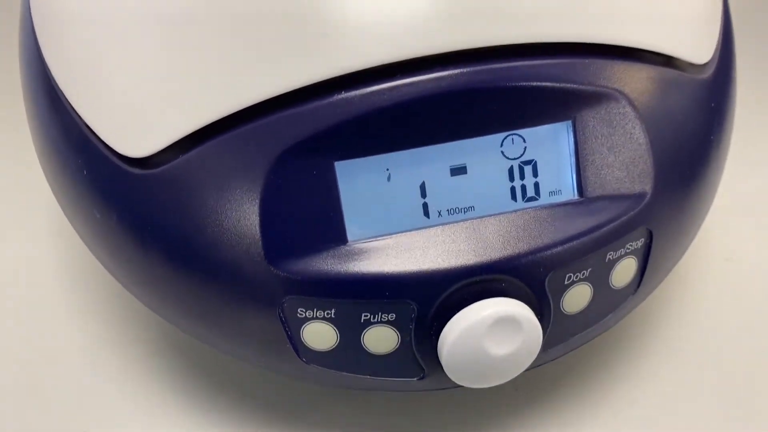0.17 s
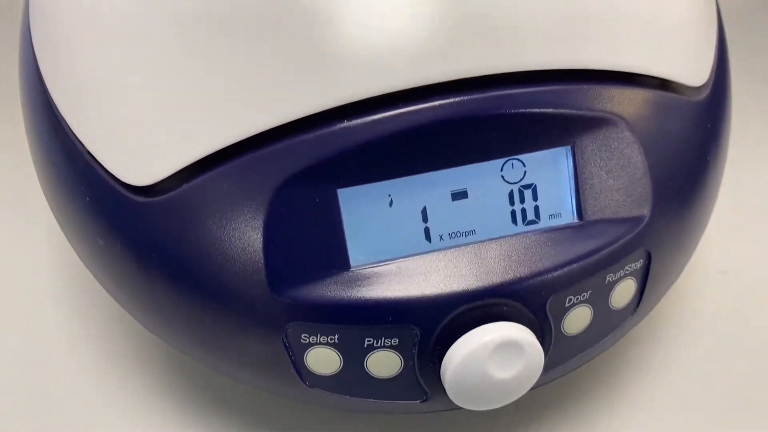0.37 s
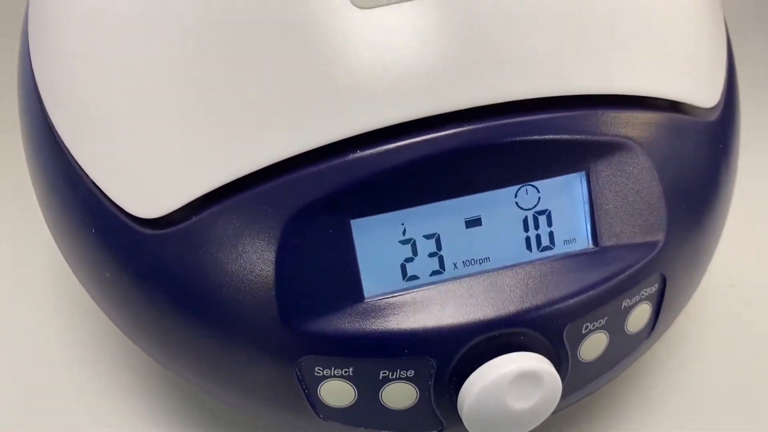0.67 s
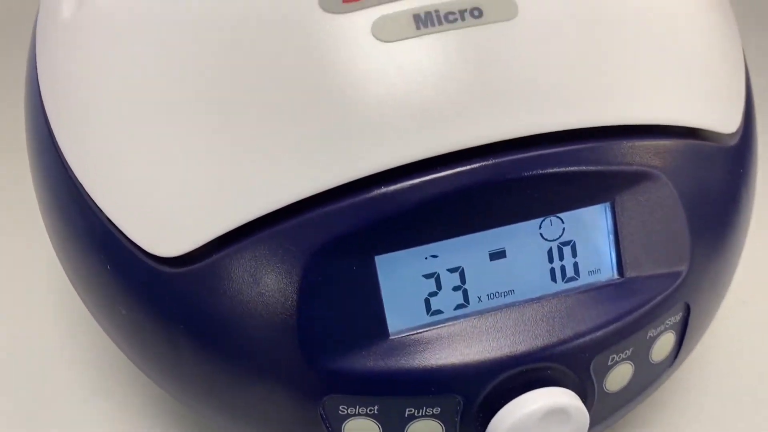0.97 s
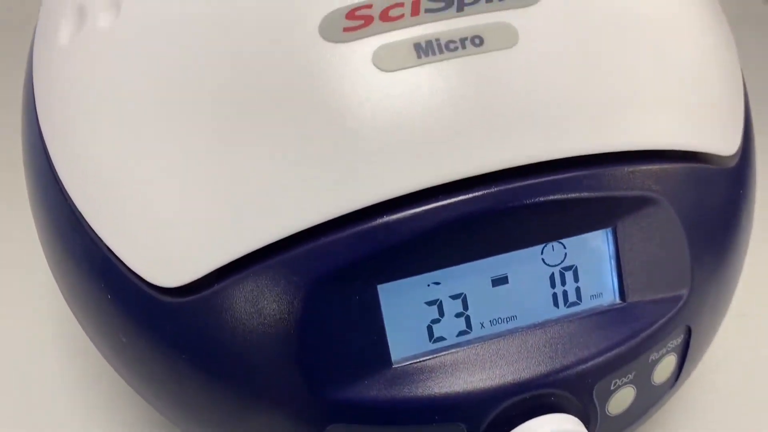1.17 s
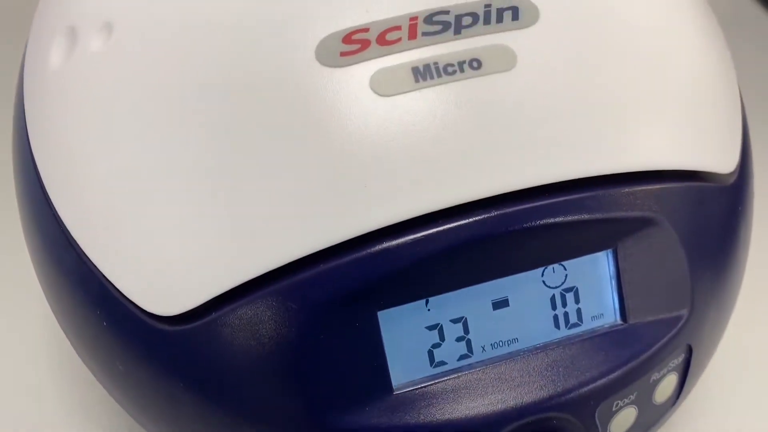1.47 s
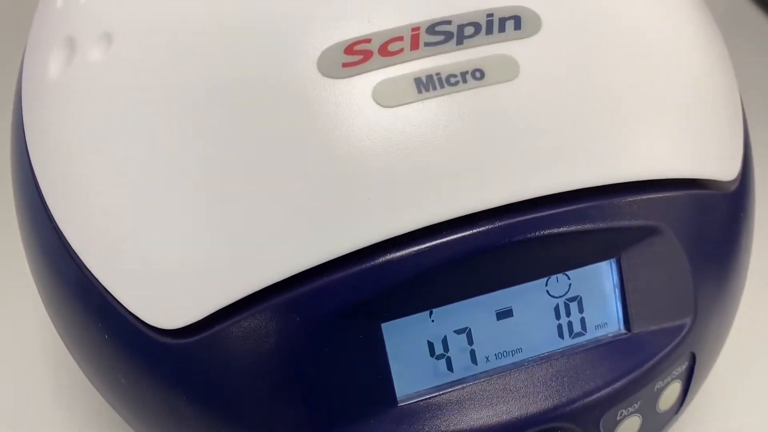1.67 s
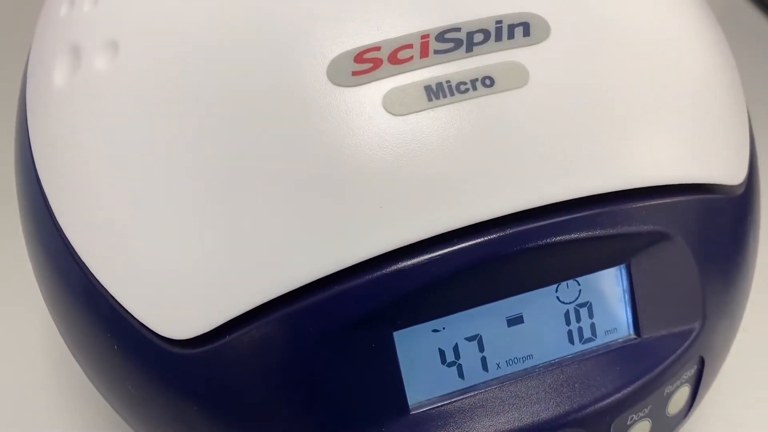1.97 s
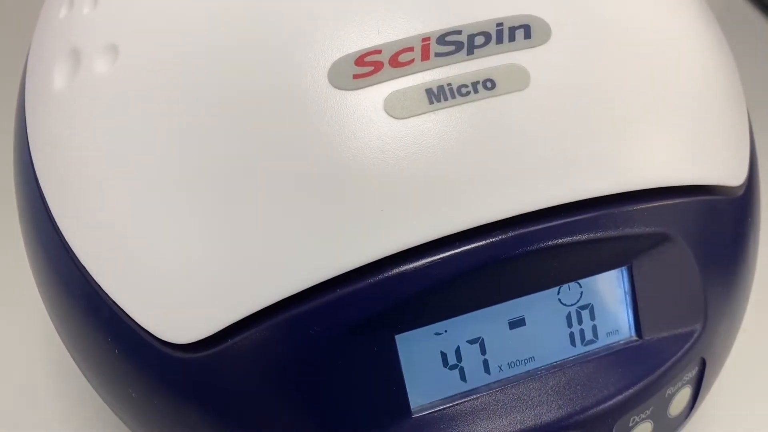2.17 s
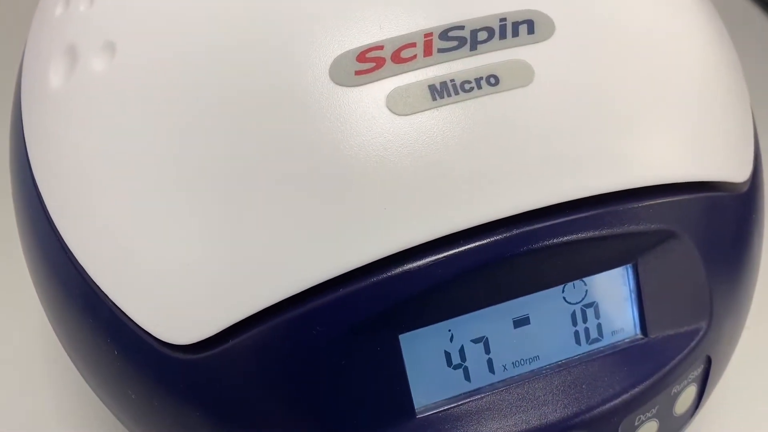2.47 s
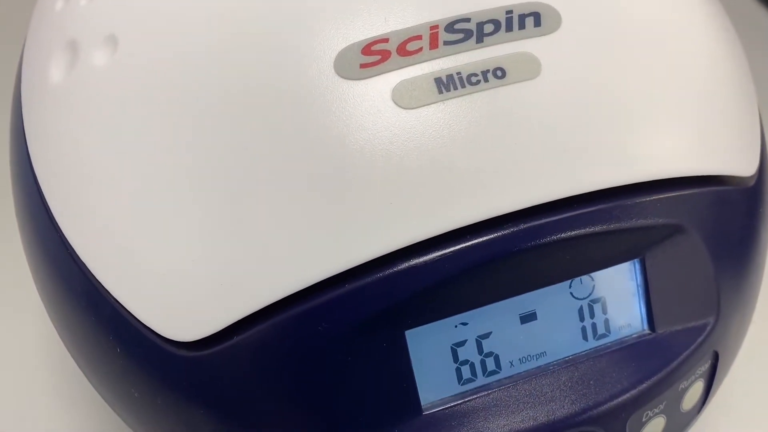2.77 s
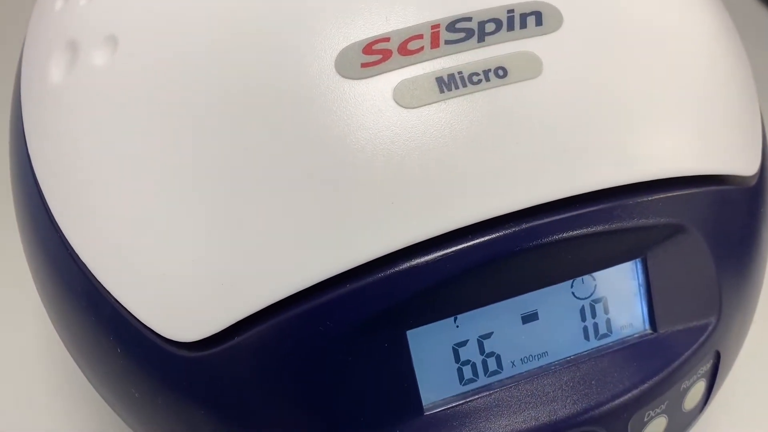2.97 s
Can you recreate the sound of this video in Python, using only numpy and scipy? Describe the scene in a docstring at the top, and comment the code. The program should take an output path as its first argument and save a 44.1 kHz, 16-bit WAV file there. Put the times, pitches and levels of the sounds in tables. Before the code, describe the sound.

Rough, chirping motor whirr of a benchtop centrifuge rises as it accelerates over faint room rumble

```python
"""A rough motor whirr close by climbs in pitch: a small centrifuge spinning up on a lab bench, still rising at the end.
The whirr is one pattern repeated each turn; its multiples climb one after another through the housing and chirp there.
Filtered noise, ringing panels and wavering sines make the rotor's air and bearings, which grow or climb with speed.
Underneath, the room's ventilation rumbles, draws air and hums, built from noise and two steady-pitched sines."""
import sys
import numpy as np
from scipy import signal
from scipy.fft import rfft, irfft, next_fast_len
from scipy.io import wavfile
from scipy.ndimage import uniform_filter1d

SR = 44100
rng = np.random.default_rng(int(sys.argv[2]) if len(sys.argv) > 2 else 0)


def materialize(psi):
    """Save the field psi as 16-bit PCM at rate SR to the path in sys.argv[1].

    A 1-D psi becomes a single channel; in a 2-D psi each row is a channel.
    """
    bounded = np.clip(np.atleast_2d(psi).T, -1, 1)
    quanta = np.round(bounded * 32767).astype(np.int16)
    wavfile.write(sys.argv[1], SR, quanta)


N = 137151

# rotor speed closes in exponentially on its goal (turns per s, turns per s, time constant in s)
START_HZ, GOAL_HZ, SPIN_UP_S = 42.95, 242.8, 4.616
REFERENCE_HZ = 125  # speed in turns per s at which the speed-driven levels hold

# whirr: multiples that drive the housing's main resonance [multiple: level/dB before the housing]
MAIN_ORDERS = {19: 14.5, 22: 13.5, 25: 9.5, 28: 12, 31: 5, 34: 11, 37: -1, 40: 9.5, 43: -2, 46: 7.5, 52: 7}
# how the housing passes them [f/Hz, gain/dB]
MAIN_HOUSING = [(500, -8), (900, -24), (1100, -25), (1650, -26), (2030, -34), (2255, -22), (2300, -10),
                (2340, -2), (2385, 1.5), (2422, -2), (2468, 1.5), (2495, -.5), (2518, -8), (2545, -1.5),
                (2568, -6.5), (2598, -1), (2635, -12), (2690, -19), (2950, -24), (3500, -33), (5500, -33),
                (8000, -42), (12000, -20), (15500, -24)]
# weaker family that also reaches lower resonances [multiple: level/dB before the housing]
LOWER_ORDERS = {17: 2, 20: 3, 23: -2, 26: 2, 29: -2, 32: -3}
# how the housing passes those [f/Hz, gain/dB]
LOWER_HOUSING = [(1000, -26), (2080, -17), (2145, 2), (2205, -7), (2255, 3), (2290, -8), (2385, -1),
                 (2430, -6), (2595, 0), (2640, -7), (2740, -8), (3200, -22)]
# every third multiple, favouring the highest main peak [multiple: level/dB before the housing]
HIGHEST_ORDERS = {18: 1, 21: 8.5, 24: 1, 27: 8, 30: 3, 33: 6.5, 36: 2, 39: 7, 45: 3}
# how the housing passes those [f/Hz, gain/dB]
HIGHEST_HOUSING = [(1000, -22), (2320, -18), (2390, -6), (2475, -2), (2525, -7), (2598, 2.5), (2640, -9),
                   (2740, -14), (3300, -28)]
OTHER_ORDERS_DB, ORDER_SPREAD_DB = -12, 3  # every other multiple up to 149, through the main housing: centre level/dB, random spread/dB
SHAKE_TURNS, SHAKE_PER_S = .0006, 25  # unsteady rotor angle: spread in turns, wander rate in Hz
WHIRR_DB, WHIRR_DB_PER_OCTAVE = -58.6, 1  # gain on the pattern at the reference speed, rise with speed
WHIRR_WAVER_DB, WHIRR_WAVER_PER_S = .9, 14  # level wander: spread in dB, rate in Hz
WHIRR_ROOM_DB, ROOM_T60_S = -17, 0.077  # reflections against direct sound, 60 dB decay time

# bearing tones, mostly between multiples of the turning rate [multiple: level/dB before the housing]
BEARING_TONES = {28.3: -69, 31.85: -71, 35.4: -72, 37.12: -68, 38: -72, 39.25: -74, 42.45: -70, 46: -73,
                 55.3: -72}
# upper resonances that pass them [f/Hz, gain/dB]
UPPER_HOUSING = [(2500, -10), (3550, -8), (3720, 0), (3880, 2), (4020, -2), (4130, 3), (4260, -5),
                 (4520, 0), (5300, -4), (6300, -3), (8000, -12)]

# air rush colour [f/Hz, relative density/dB]
RUSH = [(30, -85), (200, -68), (450, -62), (620, -66.5), (870, -65), (1030, -74), (1350, -69.5),
        (1700, -66.5), (2050, -71.5), (2280, -70), (2400, -66.5), (2600, -66), (2690, -70.5), (2820, -73),
        (3500, -77), (3900, -77.5), (4800, -81), (5800, -86), (8000, -97.5), (16000, -115)]
RUSH_DB, RUSH_DB_PER_OCTAVE = -43, 0.5
# low churning of air under the lid [f/Hz, relative density/dB]
CHURN = [(25, -33), (60, -20), (130, 6), (220, -6), (280, -2.5), (370, -0.5), (480, -7.5), (700, -22),
         (1200, -13.5), (3000, -39)]
CHURN_DB, CHURN_DB_PER_OCTAVE = -40, 11.5
# bearing hiss colour [f/Hz, relative density/dB]
HISS = [(3000, -11), (5700, -7), (6400, 4.5), (7300, 6), (7700, 4.5), (10500, -0.5), (12300, 8),
        (14000, -2.5), (16000, 6)]
HISS_DB, HISS_DB_PER_OCTAVE = -51, 3.5
# low tones of the rotor stirring the air, at reference speed [multiple: level/dB before the body]
ROTOR_TONES = {1: -42.5, 3: -49.5, 6: -54, 12: -60, 13: -64}
ROTOR_DB_PER_OCTAVE = 14
# how the body radiates those tones [f/Hz, gain/dB]
BODY = [(100, 0), (320, -5), (357, 3.5), (378, -2), (395, -7), (720, -8), (752, 0), (790, 1), (810, -6),
        (1400, -5), (1510, 1), (1700, -4)]
# panel resonances stirred by turbulence, at reference speed [f/Hz, width/Hz, level/dB before panning]
PANELS = [(140.8, 9.2, -43), (270.3, 17, -54), (302.4, 23, -52), (358, 106, -53.5), (525, 40, -54.5),
          (822, 21, -55), (885, 16, -53.5), (939, 46, -56.5), (1111, 13, -60), (1313, 36, -55),
          (1528, 40, -57.5), (1754, 100, -75), (3860, 22, -66), (3920, 83, -63.5), (4080, 90, -64),
          (4680, 50, -68.5)]
PANEL_DB_PER_OCTAVE = 3.5

# the deepest rumble swells and sinks [t/s, level/dB before panning]
RUMBLE_LEVEL = [(0.0, -35), (0.83, -35.5), (0.96, -28), (1.0, -52), (1.07, -31.5), (1.16, -41.5),
                (1.35, -29.5), (1.4, -39), (1.56, -27.5), (1.58, -38), (2.1, -29.5), (2.13, -36),
                (2.16, -32), (2.2, -37.5), (2.75, -31), (3.0, -39), (3.05, -26.5), (3.11, -37)]
# rumble colour [f/Hz, relative density/dB]
RUMBLE = [(20, -73), (36, -23.5), (48, -9.5), (70, 0.5), (95, -0.5), (118, -21.5), (170, -28), (400, -65)]
RUMBLE_EVEN_S = .08  # natural swells of the rumble noise are levelled over this time
# ventilation draught colour [f/Hz, relative density/dB]
DRAUGHT = [(25, -70), (50, -57), (105, -53), (120, -48), (140, -42.5), (170, -46), (230, -55), (285, -47),
           (400, -67), (520, -58), (900, -60.5), (1200, -67), (4000, -121)]
DRAUGHT_DB = -39
# humming tones of the room [f/Hz, level/dB before panning]
HUM = [(199.4, -45), (657.5, -58)]
ROTOR_WAVER_DB, BEARING_WAVER_DB, HUM_WAVER_DB = 3.2, 3, 2.5  # spread of each tone's level wander

# stereo width of all the noise [f/Hz, side minus mid/dB]
WIDTH = [(60, -25), (170, -11), (350, -7.5), (700, -2), (1400, 1.5), (2450, -0.5), (4500, -6.5),
         (9000, 4.5), (14000, -2)]
WHIRR_PAN_DB, AIR_PAN_DB, VENT_PAN_DB = 2, 0.75, .75  # left raised and right lowered, each by this much
CUTOFF_HZ = 15700


def whirr(turns, octaves):
    """Motor roughness repeats ever faster; three families of multiples each ring the housing their own way."""
    angle = turns + SHAKE_TURNS * drift(SHAKE_PER_S)
    main = colour(each_turn(angle, MAIN_ORDERS, OTHER_ORDERS_DB), MAIN_HOUSING)
    lower = colour(each_turn(angle, LOWER_ORDERS, -np.inf), LOWER_HOUSING)
    highest = colour(each_turn(angle, HIGHEST_ORDERS, -np.inf), HIGHEST_HOUSING)
    shell = main + lower + highest
    waver_db = WHIRR_WAVER_DB * drift(WHIRR_WAVER_PER_S)
    level_db = WHIRR_DB + WHIRR_DB_PER_OCTAVE * octaves + waver_db
    in_room = shell + from_db(WHIRR_ROOM_DB) * room(shell)
    return from_db(level_db) * pan(WHIRR_PAN_DB) * in_room


def each_turn(angle, orders, others_db, count=150, size=8192):
    """A pattern of multiples of the turning rate, drawn as one cycle and read by the rotor's angle."""
    db = others_db + ORDER_SPREAD_DB * rng.standard_normal(count)
    for multiple, level_db in orders.items():
        db[multiple] = level_db
    phases = np.exp(2j * np.pi * rng.random(count))
    partials = from_db(db) * phases * (np.arange(count) > 0)  # no constant offset
    pattern = irfft(partials, size) * size / np.sqrt(2)  # each partial's rms matches its level
    return np.interp(angle, np.arange(size) / size, pattern, period=1)


def rotor(turns, octaves):
    """Rush, churning, ringing panels, low tones and bearing hiss, all growing with speed."""
    rush = from_db(RUSH_DB + RUSH_DB_PER_OCTAVE * octaves) * air(RUSH)
    churn = from_db(CHURN_DB + CHURN_DB_PER_OCTAVE * octaves) * air(CHURN)
    hiss = from_db(HISS_DB + HISS_DB_PER_OCTAVE * octaves) * air(HISS)
    growth_db = ROTOR_DB_PER_OCTAVE * octaves
    tones = sum(wavering_tone(multiple * turns, db + growth_db, ROTOR_WAVER_DB)
                for multiple, db in ROTOR_TONES.items())
    return pan(AIR_PAN_DB) * (rush + churn + panels(octaves) + colour(tones, BODY)) + hiss


def panels(octaves):
    """Turbulence keeps the lid and shell ringing in their resonances, as noise through two-pole resonators."""
    shaking = air([(20, 0), (20000, 0)])
    out = 0
    for k, (hz, width_hz, db) in enumerate(PANELS):
        r = np.exp(-np.pi * width_hz / SR)
        poles = [1, -2 * r * np.cos(2 * np.pi * hz / SR), r * r]
        ringing = signal.lfilter([1, 0, -1], poles, shaking)
        out = out + (-1) ** k * from_db(db) * rms_one(ringing)  # alternate polarity
    return from_db(PANEL_DB_PER_OCTAVE * octaves) * out


def bearings(turns):
    """The rolling balls sing faint, unsteady tones that climb through the upper resonances."""
    tones = sum(wavering_tone(multiple * turns, db, BEARING_WAVER_DB)
                for multiple, db in BEARING_TONES.items())
    return pan(AIR_PAN_DB) * colour(tones, UPPER_HOUSING)


def ventilation(t):
    """A surging deep rumble, a steady draught and two humming tones."""
    deep = air(RUMBLE)
    power = uniform_filter1d(np.mean(deep ** 2, axis=0), int(RUMBLE_EVEN_S * SR))
    level_db = np.interp(t, *np.transpose(RUMBLE_LEVEL))
    rumble = from_db(level_db) * deep / np.sqrt(power)
    draught = from_db(DRAUGHT_DB) * air(DRAUGHT)
    hum = sum(wavering_tone(hz * t, db, HUM_WAVER_DB) for hz, db in HUM)
    return pan(VENT_PAN_DB) * (rumble + draught + hum)


def room(x):
    """Diffuse reflections of the lab: a decaying noise tail, different at each ear."""
    t = np.arange(SR // 2) / SR
    tail = rng.standard_normal((2, len(t))) * from_db(-60 * t / ROOM_T60_S)
    tail /= np.sqrt(np.sum(tail ** 2, axis=1, keepdims=True))
    return signal.fftconvolve(x[None], tail, axes=1)[:, :N]


def air(spectrum):
    """Stereo turbulence from mid and side noise, its width set by frequency; overall rms 1."""
    mid, side = rng.standard_normal((2, N))
    side = colour(side, WIDTH)
    # undo the loudness that the side signal adds
    evening = [(hz, -10 * np.log10(1 + from_db(db) ** 2)) for hz, db in WIDTH]
    stereo = np.array([mid + side, mid - side])
    return rms_one(colour(colour(stereo, evening), spectrum))


def wavering_tone(cycles, level_db, waver_db):
    """A sine whose level wanders, starting at a random phase."""
    gain = np.sqrt(2) * from_db(level_db + waver_db * drift(17.4))
    return gain * np.sin(2 * np.pi * (cycles + rng.random()))


def drift(rate):
    """Slow random wander with spread 1: noise through two equal poles at the rate in Hz."""
    step = 40  # samples between computed points
    r = np.exp(-2 * np.pi * rate * step / SR)
    noise = rng.standard_normal(N // step + 2002)
    slow = signal.lfilter([1], [1, -2 * r, r * r], noise)[2000:]  # drop the filter's settling
    return np.interp(np.arange(N) / step, np.arange(len(slow)), rms_one(slow))


def colour(x, points):
    """Filter by gains in dB joined by straight lines over log frequency."""
    hz, db = np.transpose(points)
    size = next_fast_len(N + SR // 10)
    bins = np.maximum(np.arange(size // 2 + 1) * SR / size, 1)
    gain = from_db(np.interp(np.log(bins), np.log(hz), db))
    return irfft(rfft(x, size) * gain, size)[..., :N]


def pan(left_db):
    """Gains of the left and right channels, offset in opposite directions."""
    return from_db([[left_db], [-left_db]])


def rms_one(x):
    """Scale to unit rms."""
    return x / np.sqrt(np.mean(x ** 2) + 1e-20)


def from_db(db):
    """Decibels to amplitude gain."""
    return 10 ** (np.asarray(db) / 20)


def scene():
    """The rotor's speed drives the whole machine; the room's ventilation runs on regardless."""
    t = np.arange(N) / SR
    speed = GOAL_HZ + (START_HZ - GOAL_HZ) * np.exp(-t / SPIN_UP_S)
    turns = np.cumsum(speed) / SR
    octaves = np.log2(speed / REFERENCE_HZ)
    return whirr(turns, octaves) + rotor(turns, octaves) + bearings(turns) + ventilation(t)


def record(dry):
    """A steep elliptic low-pass cuts off the top."""
    low_pass = signal.ellip(12, .1, 90, CUTOFF_HZ, fs=SR, output="sos")  # ripple and stopband in dB
    return signal.sosfilt(low_pass, dry)


dry = scene()
out = record(dry)
materialize(out)
```